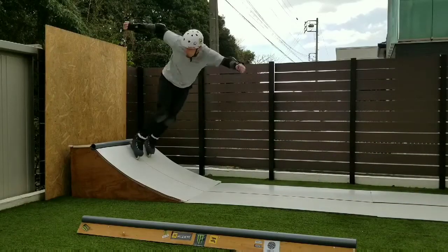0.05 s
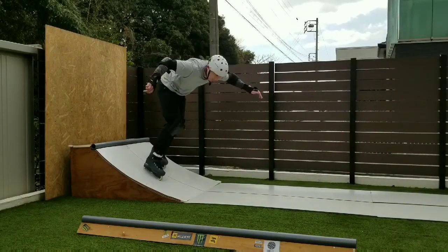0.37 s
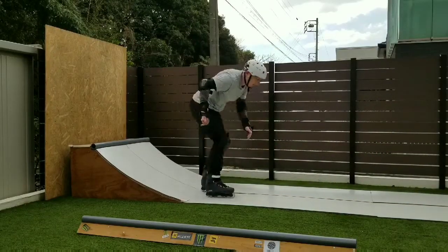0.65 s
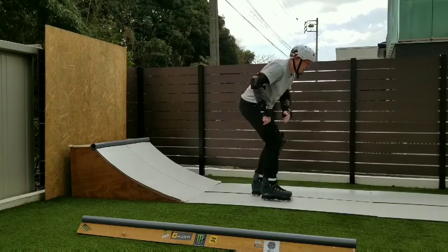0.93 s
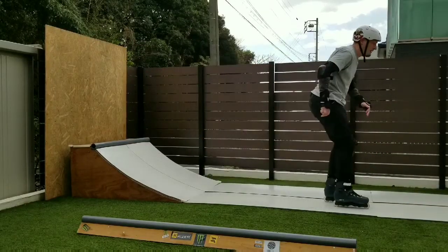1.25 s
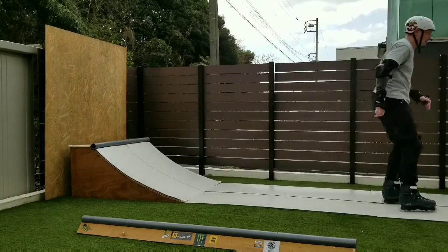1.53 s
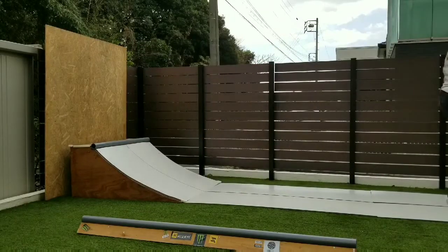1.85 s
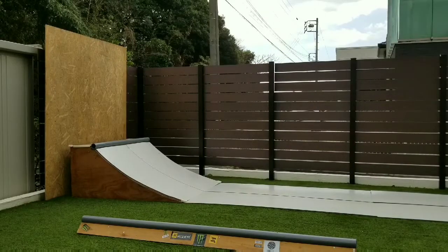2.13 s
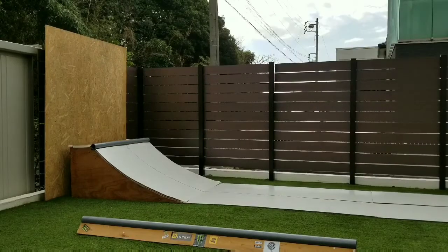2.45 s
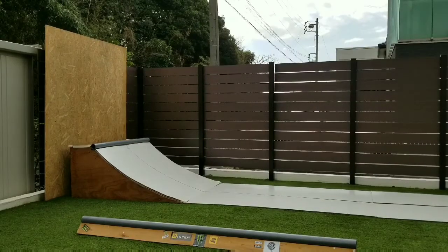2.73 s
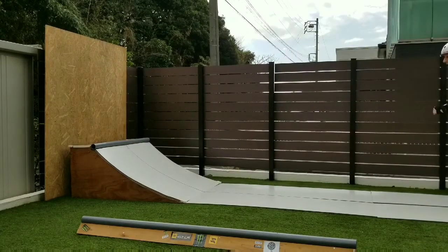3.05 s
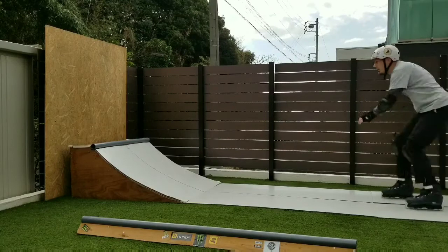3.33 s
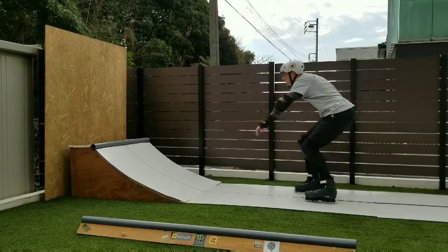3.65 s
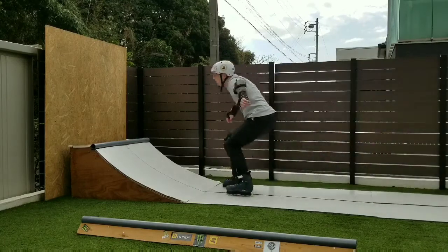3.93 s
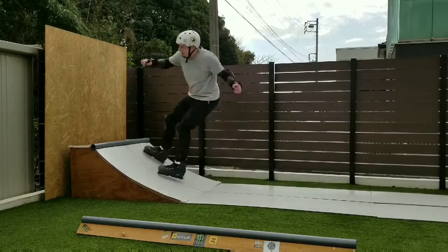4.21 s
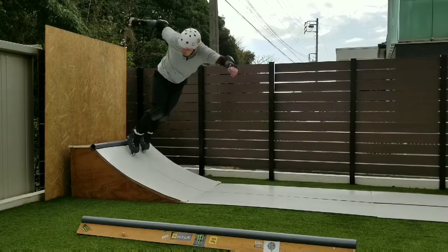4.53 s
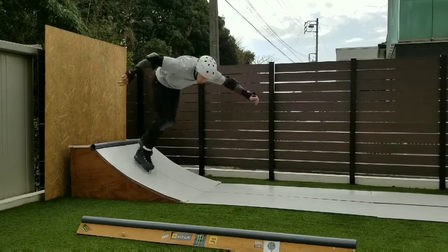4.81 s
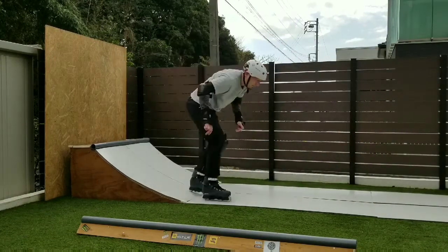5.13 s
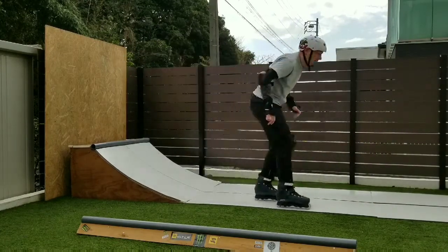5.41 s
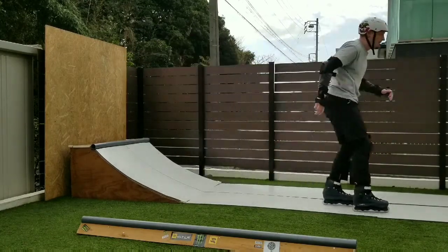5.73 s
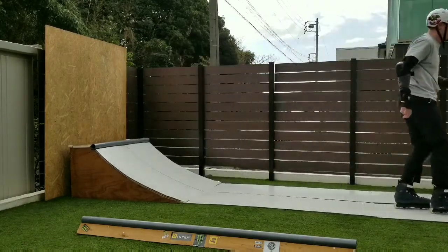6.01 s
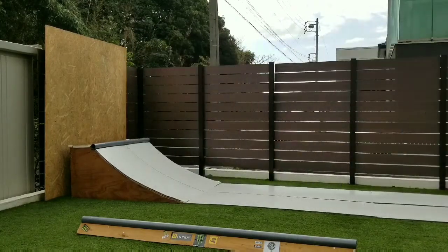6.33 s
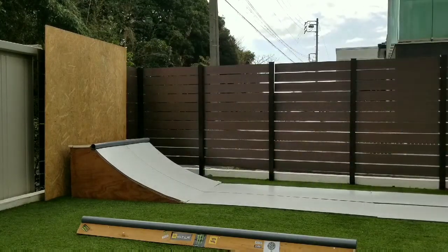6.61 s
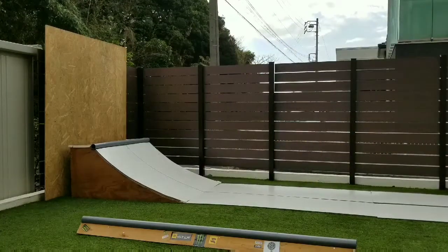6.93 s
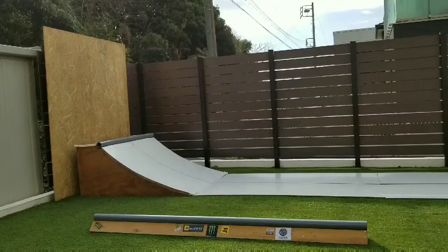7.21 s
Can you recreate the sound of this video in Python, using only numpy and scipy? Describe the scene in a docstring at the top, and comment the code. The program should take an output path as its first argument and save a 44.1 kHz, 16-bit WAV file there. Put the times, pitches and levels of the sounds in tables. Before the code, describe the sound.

Inline skates land on a hollow plywood ramp with a few booming knocks in the first half second. The wheels rumble onto a flat deck and clack over its panel joints around 0.8 seconds, then tick more softly and fade by about 2 seconds. At 2.5 seconds the rolling returns with whirring bearings and light swishes, crossing joints with sharp clacks from 3 to 3.7 seconds. Between 4.1 and 5 seconds the skates hit the ramp in a dense cluster of knocks, thuds and board rattles, with small axle clicks. More loud joint clacks follow until 5.4 seconds, and the rumble gradually recedes. At about 6.8 seconds comes a quick run of light, gritty clacks, and at 7.2 a soft low drone with a faint whine sets in. The surrounding fence and walls add short echoes to the nearby impacts.

```python
"""A fenced yard: an inline skater rides a small plywood quarter pipe twice. Skates knock on the hollow ramp,
rumble over the flat deck and clack across its panel joints; fence and walls answer. Bearings whirr, skimming
wheels swish, axles click. Late on comes a quick run of light, gritty clacks; then the scene changes to a low
drone with a faint whine over air noise."""
import sys
import numpy as np
from scipy import signal
from scipy.fft import rfft, irfft, next_fast_len
from scipy.io import wavfile
from scipy.ndimage import uniform_filter1d, map_coordinates

SR = 44100
rng = np.random.default_rng(int(sys.argv[2]) if len(sys.argv) > 2 else 0)


def bounce(signal):
    """Save signal as a 16-bit WAV file at the path given by the first command-line argument."""
    frames = np.transpose(np.atleast_2d(signal))
    limited = np.clip(frames, -1, 1)
    pcm = np.round(limited * 32767).astype(np.int16)
    wavfile.write(sys.argv[1], SR, pcm)


N = 328986
TIME = np.arange(N) / SR
HIT_N = int(.7 * SR)
AGE = np.arange(HIT_N) / SR  # s since a hit

# noise spectra of plywood knock, boot clack, frame crack: freq_hz, density_db
PLYWOOD_SPECTRUM = [(30, -46.5), (90, -21.5), (160, 3), (230, 2.5), (380, 3.5), (520, -5.5), (750, -12.5),
                    (1100, -20), (1800, -51), (4000, -54), (9000, -110)]
BOOT_SPECTRUM = [(400, -30.5), (780, 8.5), (1150, 3.5), (1600, 0.5), (2100, -4), (2800, -12), (5000, -40),
                 (10000, -100)]
FRAME_SPECTRUM = [(1400, -15.5), (2400, -1), (3600, -3.5), (4400, -5.5), (5200, -8), (6600, -10),
                  (8200, -13.5), (9000, -23), (12200, -22), (13000, -39.5), (14500, -38)]
# left-right likeness: freq_hz, correlation
EAR_CORRELATION = [(100, .96), (300, 0.94), (550, 0.6), (1000, 0.15), (3000, 0.12), (12000, 0.2)]


def quarter_pipe():
    """Landings boom in the hollow box, ring its skin and the pipe, rattle boards, boots and frames."""
    # start_s, knock_db, thud_db, rattle_db, clack_db, crack_db, note_hz, note_db
    # thud to crack re knock; note_db is the note's weight within the knock
    landings = [(0.15, -23.5, 3.5, -16, -20, -27.5, 166, -3.5),
                (0.173, -24, -4, -12, -12.5, -23.5, 285, -3.5),
                (0.197, -31, -12, -8, -19, -35.5, 329, -3.5), (0.437, -56, 10.5, -5, -32, -48, 530, -6),
                (4.146, -28.5, -14.5, -8.5, -16.5, -23, 148, -2.5),
                (4.155, -29, -8.5, -11.5, -15, -28, 259, -8), (4.177, -36.5, 3, -37, -27.5, -34.5, 414, 5),
                (4.204, -28.5, -3.5, -7, -19, -27, 345, -19),
                (4.218, -21.5, -14, -17.5, -24, -33, 245, 3.5),
                (4.285, -28, -17, -16, -21, -30.5, 397, -0.5), (4.298, -26.5, -7, -27, -33, -36, 399, 2.5),
                (4.322, -32.5, -8.5, -8.5, -17.5, -27.5, 386, 2.5),
                (4.37, -36, -6.5, -10.5, -20, -29, 369, -3), (4.455, -53, 13, -25.5, -28.5, -30.5, 180, -5),
                (4.63, -24.5, 3.5, -14, -16, -25, 380, -4), (4.653, -33.5, -7, -9, -10, -27.5, 374, -2),
                (4.686, -22, -13, -16, -21, -27, 386, 2.5),
                (4.716, -30.5, -2.5, -5, -8, -15.5, 224.6, -1.5),
                (4.727, -29.5, -11, -18, -21.5, -23.5, 386, 3),
                (4.755, -34.5, -2.5, -14.5, -20, -38, 225, -6.5),
                (4.937, -44, 10, -11.5, -12.5, -24.5, 192, 2), (4.974, -42.5, 5.5, -29, -28, -31, 176, 0),
                (4.998, -34, 7.5, -24, -15.5, -24.5, 186, 2.5),
                (5.014, -31.5, -16, -9.5, -20.5, -33, 374, -1)]
    # modes: freq_hz, level_db, base_t60_s
    box_modes = [(59.4, -9, 0.32), (78.4, 7.5, 0.27), (92.6, -0.5, 0.67), (120.8, 2, 0.36),
                 (143, 2.5, 0.29)]
    skin_modes = [(190, 2, 0.25), (235, -0.5, 0.2), (240, -4, 0.16), (277, -10.5, 0.4), (305.6, -1.5, 0.54),
                  (370, -5, 0.53), (378, -17.5, 0.092), (481, -2.5, 0.19), (535.5, -3, 0.37),
                  (622, -15, 0.29), (681, -12, 0.17), (815, -10.5, 0.14), (830, -33, 0.2)]
    pipe_modes = [(1071, 4.5, 0.13), (1240, -2, 0.16), (1530, -10.5, .3), (1620, -10.5, 0.17),
                  (1860, -15.5, 1), (2370, -12.5, 0.56), (2680, -14, 0.3), (2903, -19, 0.28),
                  (3420, -16, 0.27), (4160, -8, .15)]
    loose_board_modes = [(458.2, 3.5, 0.22), (530.4, 3, 0.24), (605, 2.5, 0.25), (657, 2.5, 0.21),
                         (750, 9.5, 0.07), (801.4, -1, 0.072), (864, -10.5, 0.18), (1000, -16.5, 0.1),
                         (1087, -10.5, 0.11), (1170, -6.5, 0.13)]
    out = np.zeros((2, N))
    for start_s, knock_db, thud_db, rattle_db, clack_db, crack_db, note_hz, note_db in landings:
        thud = amp(thud_db) * ring(box_modes, t60_scale=.53, attack_s=.0054, detune=.031)
        skin = amp(-8) * ring(skin_modes, t60_scale=.69, attack_s=.003, detune=.008)
        skin += amp(note_db) * panel_note(note_hz, t60_s=.069)
        knock = punch(skin + amp(-2) * noise(PLYWOOD_SPECTRUM) * fade(.12, .0027))
        contacts = chatter(gap_s=.0057, t60_s=.11, step_db=14.5, count=5)
        boot = punch(noise(BOOT_SPECTRUM) * (contacts + .39 * fade(.093, .0073)))
        pipe = amp(-7) * ring(pipe_modes, t60_scale=.4, attack_s=.00065, detune=.003)
        frame = punch(noise(FRAME_SPECTRUM) * (contacts + fade(.12, .0099)) * rise(.0067))
        boards = amp(rattle_db) * ring(loose_board_modes, t60_scale=.6, attack_s=.004, detune=.009)
        blow = thud + knock + boards + amp(clack_db) * (boot + pipe) + amp(crack_db) * frame
        add(out, start_s, amp(knock_db) * yard(blow, early_db=-18.5, tail_db=-6))
    return out


def deck_joints():
    """Wheels drop over joints: frame cracks, shell rings, loose panels slap the damping turf."""
    # start_s, knock_db, clack_db, crack_db, shell_db (these three re knock), note_hz, skin_t60_scale
    crossings = [(0.714, -32.5, -20.5, -29, -30, 187, 1), (0.774, -36.5, -16, -25, -29, 328, 0.22),
                 (0.790, -24.5, -20.5, -43, -27.5, 207, 0.44), (0.795, -39, -25, -19, -23, 290, 0.33),
                 (0.845, -28, -18, -28, -39, 197, 0.78), (0.852, -35, -15, -23.5, -17.5, 373, .5),
                 (0.858, -46.5, 1.5, -24, -2.5, 388, .8), (1.476, -51.5, -39, -33, -48, 216, 0.59),
                 (1.522, -55.5, -41, -36, -43, 173, 1), (1.594, -44.5, -32, -31.5, -49, 184, 0.91),
                 (1.642, -46.5, -42, -31, -47, 276, 0.53), (1.747, -40.5, -20.5, -30.5, -30, 372, 0.56),
                 (2.246, -67, -37, -38.5, -39, 175, .7), (2.348, -71, -33, -36.5, -39, 253, 0.76),
                 (2.52, -52, -38, -38, -40, 62, 0.82), (2.997, -29.5, -21.5, -29.5, -41, 232, 0.24),
                 (3.017, -36.5, -12, -21, -25, 249, 0.64), (3.33, -32, -14.5, -28, -34, 179, 0.32),
                 (3.517, -44, -31, -39, -41, 449, 0.7), (3.578, -35, -30, -27, -29, 197, 0.61),
                 (3.612, -31, -35, -29, -27.5, 229, 0.5), (3.67, -33, -22.5, -27.5, -32, 171, 0.64),
                 (5.149, -41, -34, -28, -42, 204, .8), (5.19, -32.5, -17, -28.5, -40, 159, 0.94),
                 (5.260, -30.5, -13.5, -29, -36, 184, 0.4), (5.269, -28.5, -20.5, -29.5, -31, 353, 0.79),
                 (5.337, -25, -21, -30, -26, 337, 0.71), (5.385, -43.5, -40, -25.5, -27, 300, 0.52),
                 (5.88, -53, -39, -44, -46, 180, 0.74), (5.992, -41.5, -47, -42, -52, 183, 0.38),
                 (6.115, -44.5, -27, -29, -47, 174, 0.75)]
    # modes: freq_hz, level_db, base_t60_s
    box_modes = [(55.8, -2.5, 0.33), (70.8, -3.5, 0.5), (92.8, 3, 0.44), (125.3, 0.5, 0.3),
                 (148.6, 11, 0.16)]
    skin_modes = [(166.5, 3.5, 0.091), (211.1, -5, 0.41), (229.4, 4, 0.16), (301.4, 4, 0.11),
                  (347, -22, 0.085), (369.2, -5, 0.29), (455.7, -14, 0.65), (504, -4.5, 0.18),
                  (638, -9, 0.23), (740, -33, 0.033), (1224, -24, 0.28)]
    mid_panel_hz = 185
    out = np.zeros((2, N))
    for start_s, knock_db, clack_db, crack_db, shell_db, note_hz, skin_t60_scale in crossings:
        thud_db = -5 - .5 * np.log2(note_hz / mid_panel_hz)  # stiffer spots ring higher, thud less
        thud = amp(thud_db) * ring(box_modes, t60_scale=.58, attack_s=.0035, detune=.077)
        skin = amp(-7) * ring(skin_modes, skin_t60_scale, attack_s=.0019, detune=.021)
        skin += amp(-3.5) * panel_note(note_hz, t60_s=.08)
        knock = punch(skin + .69 * noise(PLYWOOD_SPECTRUM) * fade(.18, .0033))
        contacts = chatter(gap_s=.007, t60_s=.018, step_db=3, count=3)
        contacts += 1.6 * fade(.0011, .00019)  # leading wheel strikes the edge hardest
        boot = punch(noise(BOOT_SPECTRUM) * (contacts + .35 * fade(.055, .0012)))
        frame = punch(noise(FRAME_SPECTRUM) * (contacts + .48 * fade(.34, .003)))
        blow = thud + knock + amp(clack_db) * boot + amp(crack_db) * frame + amp(shell_db) * shell()
        add(out, start_s, amp(knock_db) * yard(blow, early_db=-20.5, tail_db=-9))
    return out


def panel_note(hz, t60_s):
    """The panel under the skate rings at its own pitch."""
    return punch(fade(t60_s, .004) * np.sin(2 * np.pi * hz * AGE + rng.uniform(0, 2 * np.pi)))


def chatter(gap_s, t60_s, step_db, count):
    """Contact envelope: wheel after wheel touches, unevenly spaced and falling in level."""
    envelope = np.zeros(HIT_N)
    for k, (late, strength) in enumerate(rng.uniform(-.45, 1, (count, 2))):
        start = round(gap_s * (k + late / 2) * SR) if k else 0
        envelope[start:] += amp(2 * strength - step_db * k) * fade(t60_s, .0003)[:HIT_N - start]
    return envelope


def shell():
    """The skate's hard plastic shell: a dry crack and a short ring."""
    crack_spectrum = [(900, -37.5), (1600, 2), (2300, 9), (2900, 3), (3500, 4), (4100, -4.5), (4900, -20),
                      (9000, -48.5)]  # freq_hz, density_db
    shell_modes = [(1650, 2.5, 0.066), (2010, -6, 0.091), (2190, -1.5, 0.12), (2430, -2.5, .066),
                   (2945, 1.5, 0.083), (3250, -5.5, 0.063), (3110, -3.5, 0.038), (3417, 3, 0.069),
                   (3820, 0, 0.029), (4120, -13, 0.13)]  # freq_hz, level_db, base_t60_s
    crack = punch(noise(crack_spectrum) * fade(.018, .0002))
    return amp(-1) * crack + ring(shell_modes, t60_scale=.7, attack_s=.0003, detune=.012)


def rolling():
    """Wheels rumble unevenly, panels boom under the load, bearings whirr in faint outdoor air."""
    rumble_curves = [
        [(0, -42.5), (.1, -62), (.5, -57.5), (.68, -51.5), (.98, -56), (1.12, -61), (1.72, -60), (2.18, -76),
         (2.46, -95)],
        [(2.46, -54.5), (2.92, -55.5), (3.35, -49), (4.35, -47.5), (4.55, -55.5), (5.15, -46.5), (5.6, -55.5),
         (6.08, -57.5), (6.76, -64.5), (7.08, -78), (7.19, -94)],
    ]  # one curve per ride: time_s, level_db
    rides = [(0.802, -70.5, 31, -91.5), (5.2, -64, 18.5, -89.5)]  # leaving_s, whirr_db, fade_db_per_s, air_db
    ramp_spans = [(-.2, 1.0), (4.25, 5.4)]  # weight on the hollow ramp: start_s, end_s
    # spectra: freq_hz, density_db
    wheel_spectrum = [(50, -44), (110, -3), (170, -4.5), (235, -0.5), (310, -3.5), (390, -1.5), (550, -6.5),
                      (800, -12), (1200, -20), (2000, -30.5), (5000, -39.5), (12000, -59)]
    boom_spectrum = [(20, -33), (38, -10.5), (54, 0.5), (75, -3), (110, -14), (200, -21), (1500, -110)]
    bearing_spectrum = [(500, -24), (1000, 0), (1600, -3), (2300, 1.5), (3000, -5.5), (4300, -14),
                        (5300, -14), (6600, -10), (7500, -23), (8700, -29.5), (10500, -23), (14500, -41.5)]
    air_spectrum = [(200, -8.5), (1000, -11), (3000, -4.5), (7000, -5.5), (11000, -4.5), (14500, -22)]
    boom_db, ramp_boom_db, ramp_whirr_db = -1, 7.5, -2
    rumble, whirr, air = np.zeros((3, N))
    for curve, (leaving_s, whirr_db, fade_db_per_s, air_db) in zip(rumble_curves, rides):
        time_s, level_db = np.transpose(curve)
        riding = gate(time_s[0], time_s[-1], edge_s=.022)
        rumble += riding * amp(np.interp(TIME, time_s, level_db))
        whirr += riding * amp(whirr_db - fade_db_per_s * np.maximum(TIME - leaving_s, 0))
        air += riding * amp(air_db)
    on_ramp = sum(gate(start_s, end_s, edge_s=.076) for start_s, end_s in ramp_spans)
    bumps = np.tanh(wobble(45))
    wheels = rumble * unit(noise(wheel_spectrum, N) * amp(2.6 * bumps + 1.3 * wobble(6.9)))
    boom = unit(noise(boom_spectrum, N) * amp(.46 * wobble(4.8)))
    boom *= rumble * amp(boom_db + ramp_boom_db * on_ramp)
    bearings = patchy(noise(bearing_spectrum, N) * amp(.8 * bumps), depth_db=2.3)
    bearings *= whirr * amp(ramp_whirr_db * on_ramp)
    return dulled(wheels, rumble) + boom + bearings + air * noise(air_spectrum, N)


def dulled(wheels, rumble):
    """Slower, farther wheels keep less treble."""
    split_hz, full_treble_db = 650, -54
    low = signal.sosfiltfilt(signal.butter(2, split_hz, fs=SR, output="sos"), wheels)
    return low + (wheels - low) * np.minimum(rumble / amp(full_treble_db), 1) ** .4


def skims():
    """Wheels swish as they skim sideways; once a faint whistle falls in pitch."""
    swishes = [(-.08, .08, 5990, 4370, -61.5), (0.044, 0.2, 5980, 2200, -69), (0.22, 0.4, 2570, 400, -69),
               (0.394, 0.54, 5500, 2970, -80), (0.543, .758, 6020, 2240, -72.5),
               (0.942, 1.295, 1754, 251, -81), (1.253, 1.948, 1950, 400, -96),
               (2.46, 2.56, 3210, 600, -67.5), (2.54, 2.78, 5880, 1630, -74.5),
               (2.602, 2.841, 2396, 800, -65), (2.522, 2.98, 865, 180, -67), (2.977, 3.05, 6190, 1300, -58),
               (3.055, 3.282, 2250, 300, -66), (3.04, 3.274, 2950, 1010, -63),
               (3.373, 3.53, 2260, 220, -66), (3.57, 3.95, 2990, 700, -65.5), (3.6, 4.101, 2290, 500, -65),
               (4.289, 4.58, 5040, 4000, -65), (4.512, 4.68, 5400, 3430, -65.5),
               (4.525, 4.66, 2370, 605, -64), (5.421, 5.6, 2690, 1410, -68), (5.499, 6.849, 1983, 883, -84),
               (6.08, 6.32, 4510, 1100, -70), (6.066, 6.4, 6060, 1600, -78.5),
               (6.835, 7.1, 6060, 3450, -78)]  # start_s, end_s, centre_hz, width_hz, level_db
    whistle = (2.79, 2.94, 5460, 150, -75.5, 2700)  # same columns, then fall_hz_per_s
    return sum(skim(*row) for row in swishes) + skim(*whistle)


def skim(start_s, end_s, centre_hz, width_hz, level_db, fall_hz_per_s=0):
    """One skim: a noise band that swells and fades."""
    out = np.zeros((2, N))
    t = np.arange(max(start_s, 0), end_s, 1 / SR)
    lowpass = signal.butter(2, width_hz / 2, fs=SR, output="sos")
    flutter = signal.sosfilt(lowpass, rng.standard_normal((2, len(t), 2)) @ [1, 1j])
    pitch_hz = centre_hz - fall_hz_per_s * (t - start_s)
    band = (flutter * np.exp(2j * np.pi * np.cumsum(pitch_hz) / SR)).real
    swell = np.sin(np.pi * (t - start_s) / (end_s - start_s))
    add(out, t[0], amp(level_db) * unit(band) * swell)
    return out


def gritty_clacks():
    """Light clacks with a short woody ring; the hardest cracks like plastic."""
    # start_s, grit_db, tilt_db_per_octave, wood_db, shell_db (both re grit), attack_s
    clacks = [(6.801, -64, -1, -1, -23.5, .004), (6.814, -53, 0, -1, -17, 0.0024),
              (6.829, -54.5, -1.5, -4, -21, 0.0011), (6.8445, -54.5, 1.5, -1, 1, 0.00052),
              (6.858, -59, 1.5, 3.5, -16, .001)]
    grit_spectrum = [(150, -8), (340, -19), (520, -11), (750, -3.5), (1300, -12), (2000, -11),
                     (3200, -13.5), (4100, -20.5), (5000, -29), (6800, -26.5), (9000, -42), (13000, -44.5)]  # freq_hz, density_db
    wood_modes = [(333, 8, 0.13), (517, 6, 0.086), (1100, 10.5, 0.041), (1530, -5, 0.087), (2240, 0, 0.062),
                  (2390, -6.5, 0.044), (2770, -8, 0.086), (3280, -2, 0.041)]  # freq_hz, level_db, base_t60_s
    out = np.zeros((2, N))
    for start_s, grit_db, tilt, wood_db, shell_db, attack_s in clacks:
        contacts = chatter(gap_s=.005, t60_s=.016, step_db=6, count=5)
        envelope = (contacts + .25 * fade(.13, .0017) + .05 * fade(.7, .023)) * rise(attack_s)
        grit = punch(noise(grit_spectrum, tilt_db_per_octave=tilt) * envelope)
        modes = [(hz, db + tilt * np.log2(hz), t60_s) for hz, db, t60_s in wood_modes]
        wood = amp(wood_db) * ring(modes, t60_scale=.74, attack_s=attack_s, detune=.0068)
        clack = grit + wood + amp(shell_db) * shell()
        add(out, start_s, amp(grit_db) * yard(clack, early_db=-19, tail_db=-11))
    return out


def axle_snaps():
    """A hard-struck wheel snaps against its axle: a bright click and a brief steel ring."""
    snaps = [(.79, -66, -66), (.858, -79, -67), (2.997, -79, -78), (4.147, -74, -73), (4.157, -68, -70),
             (4.69, -75, -68), (5.338, -72, -68), (5.346, -68, -68), (5.993, -87, -78), (6.014, -88, -80)]  # start_s, click_db, steel_db
    click_spectrum = [(2000, -20), (4200, -1), (8000, -2), (9500, -6), (11800, 2), (14500, -3)]  # freq_hz, density_db
    steel_modes = [(3760, 0, .035), (4100, 1, .04), (7650, -5, .035), (8050, -5, .035), (11400, -7, .035),
                   (11950, -7, .035)]  # freq_hz, level_db, t60_s
    out = np.zeros((2, N))
    for start_s, click_db, steel_db in snaps:
        click = amp(click_db) * punch(noise(click_spectrum) * fade(.018, .0001))
        steel = amp(steel_db) * ring(steel_modes, t60_scale=1, attack_s=.0003, detune=.006)
        add(out, start_s, yard(click + steel, early_db=-22, tail_db=-14))
    return out


def drone():
    """A low, wavering hum and thin whine over air noise, there at once from 7.2 s."""
    hum_tones = [(199.2, -53), (258.4, -62), (323.0, -55), (393.0, -63), (780.6, -64)]  # freq_hz, relative_db
    whine_tones = [(3634, -85.5), (4145, -86)]  # freq_hz, level_db
    air_spectrum = [(15, -41), (25, -26.5), (60, 1.5), (129, -14), (202, -14.5), (250, 7), (301, -15.5),
                    (392, -11), (554, -25), (781, -28), (940, -37), (1260, -38), (2190, -47), (6330, -47),
                    (14000, -63.5)]  # freq_hz, density_db
    start_s, rise_s = 7.2, .019
    hum = sum(amp(db + 4.8 * wobble(22)) * np.sin(2 * np.pi * hz * TIME + 1.5 * wobble(25))
              for hz, db in hum_tones)
    whine = sum(amp(db + 2 * wobble(12)) * np.sin(2 * np.pi * hz * TIME + wobble(20))
                for hz, db in whine_tones)
    onset = np.clip((TIME - start_s) / rise_s, 0, 1)
    return onset * (amp(-59.5) * unit(hum) + whine + amp(-43) * noise(air_spectrum, N))


def yard(hit, early_db, tail_db):
    """Close walls return eight echoes; a short diffuse tail dies away."""
    decay_times = [(100, 0.5), (400, 0.18), (1500, 0.41), (3000, 0.38), (6000, 0.31), (12000, 0.29)]  # freq_hz, t60_s
    hz, t, bands = signal.stft(rng.standard_normal((2, HIT_N)), SR, nperseg=256)
    bands *= amp(-60 * t / along(decay_times, hz)[:, None])
    tail = signal.istft(bands, SR, nperseg=256)[1][:, :HIT_N] * rise(.0055)
    response = amp(tail_db) * tail / np.linalg.norm(tail[0])
    lowpass = signal.butter(1, 600, fs=SR, output="sos")
    response[1] += signal.sosfilt(lowpass, response[0] - response[1])  # ears share the bass
    for delay_s, sign in zip(rng.uniform(.005, .031, size=8), rng.standard_normal(size=8)):
        for ear, skew_s in enumerate(rng.uniform(0, .0005, size=2)):
            response[ear, int((delay_s + skew_s) * SR)] += np.sign(sign) * amp(early_db)
    return hit + signal.fftconvolve(hit, response, axes=1)[:, :HIT_N]


def ring(modes, t60_scale, attack_s, detune):
    """Modes struck at a new spot, detuned at random by the skater's weight."""
    out = np.zeros((2, HIT_N))
    for (hz, db, base_t60_s), draws in zip(modes, rng.standard_normal((len(modes), 4))):
        strength, shift, sign, ear = draws
        t60_s = base_t60_s * t60_scale
        t = AGE[AGE <= 2 * t60_s]
        ear_phase = np.sign(ear) * ear_angle(hz) * np.array([[1], [-1]])
        tone = np.sin(2 * np.pi * hz * (1 + detune * shift) * t + ear_phase)
        out[:, :len(t)] += np.sign(sign) * amp(db + 2 * strength) * fade(t60_s, attack_s, t) * tone
    return punch(out)


def noise(spectrum, size=HIT_N, tilt_db_per_octave=0):
    """Coloured stereo noise, rms 1: bass shared, treble different in each ear."""
    fft_n = next_fast_len(size)
    hz = np.fft.rfftfreq(fft_n, 1 / SR)
    angle = ear_angle(hz)
    colour = amp(along(spectrum, hz) + tilt_db_per_octave * np.log2(1 + hz / 441))
    white = rfft(rng.standard_normal((2, fft_n)))
    mid, side = irfft(white * colour * [np.cos(angle), np.sin(angle)], fft_n)[:, :size]
    return unit(np.array([mid + side, mid - side]))


def ear_angle(hz):
    """Half the phase angle between the ears, rad."""
    return np.arccos(along(EAR_CORRELATION, hz)) / 2


def patchy(x, depth_db):
    """Bands of a noise swell and sink independently."""
    bands = signal.stft(x, nperseg=1024)[2]
    field = uniform_filter1d(rng.standard_normal(bands.shape[1:]), size=7, axis=0)
    field = uniform_filter1d(field, size=11, axis=1)
    return unit(signal.istft(bands * amp(depth_db * unit(field)), nperseg=1024)[1][:, :N])


def wobble(rate_hz):
    """Smooth random curve."""
    return map_coordinates(rng.standard_normal(int(N * rate_hz / SR) + 4), [TIME * rate_hz])


def rise(attack_s, t=AGE):
    """Exponential approach to 1."""
    return 1 - np.exp(-t / attack_s)


def fade(t60_s, attack_s, t=AGE):
    """Quick rise, exponential decay."""
    return amp(-60 * t / t60_s) * rise(attack_s, t)


def gate(start_s, end_s, edge_s):
    """Window with sloping edges."""
    return np.clip(np.minimum(TIME - start_s, end_s - TIME) / edge_s, 0, 1)


def along(points, hz):
    """Interpolate (freq_hz, value) points on a log axis."""
    freq_hz, values = np.transpose(points)
    return np.interp(np.log(hz + 1), np.log(freq_hz), values)


def amp(db):
    """Decibels to gain."""
    return 10 ** (np.asarray(db) / 20)


def unit(x):
    """Scale to rms 1."""
    return x / np.sqrt(np.mean(x ** 2) + 1e-20)


def punch(x):
    """Scale to rms 1 over the first 30 ms."""
    return x / np.sqrt(np.mean(x[..., :int(.03 * SR)] ** 2) + 1e-20)


def add(track, start_s, sound):
    """Mix a sound into the track."""
    part = track[:, round(start_s * SR):][:, :sound.shape[-1]]
    part += sound[..., :part.shape[-1]]


def scene():
    """All sources in the yard."""
    return quarter_pipe() + deck_joints() + rolling() + skims() + gritty_clacks() + drone() + axle_snaps()


def record(dry):
    """Lean left, thin the deepest bass, cut the top treble."""
    lean = [(30, -1), (80, 1), (160, 1), (300, 1.5), (550, 1.25), (1100, 3), (4500, 3.5), (8000, 1.5)]  # freq_hz, left_minus_right_db
    highpass_hz, top_hz = 35, 14500
    fft_n = next_fast_len(N + SR // 2)
    hz = np.fft.rfftfreq(fft_n, 1 / SR)
    thinned = signal.sosfilt(signal.butter(2, highpass_hz, "high", fs=SR, output="sos"), dry)
    balance = amp(along(lean, hz) * np.array([[.5], [-.5]]))
    return irfft(rfft(thinned, fft_n) * balance * (hz < top_hz), fft_n)[:, :N]


dry = scene()
out = record(dry)
bounce(out)
```